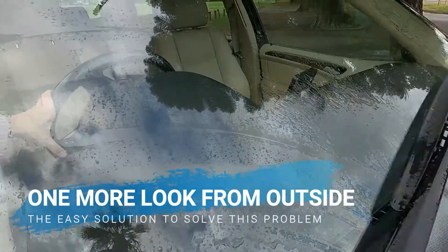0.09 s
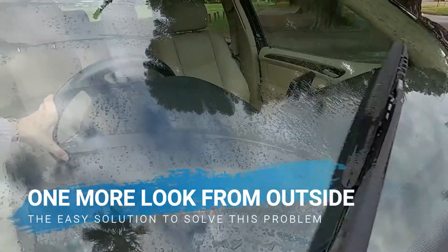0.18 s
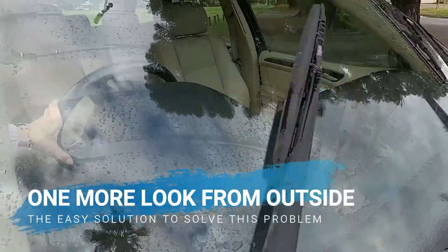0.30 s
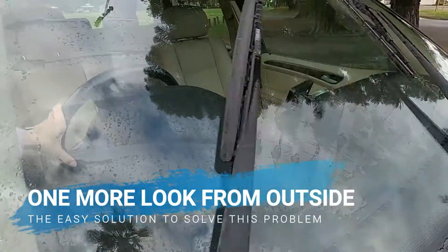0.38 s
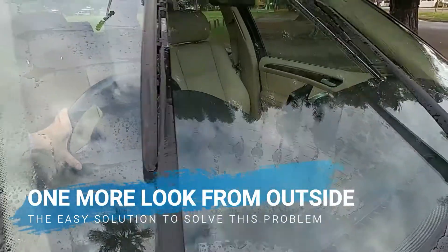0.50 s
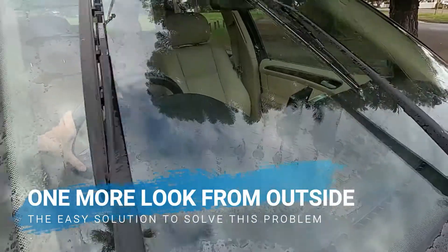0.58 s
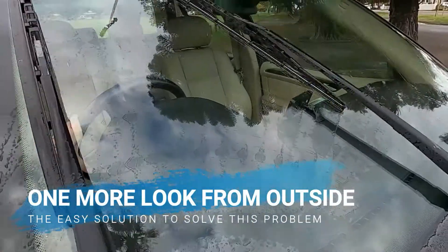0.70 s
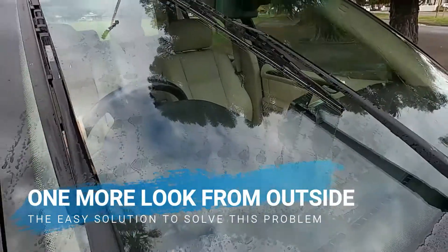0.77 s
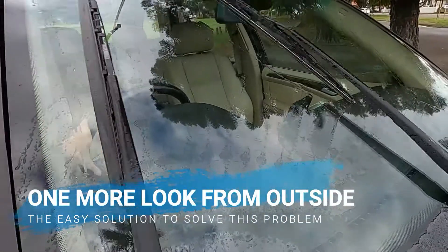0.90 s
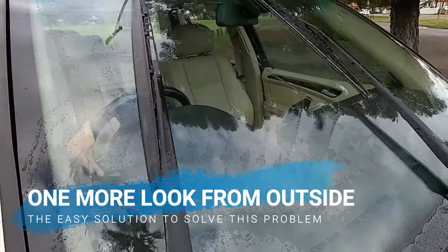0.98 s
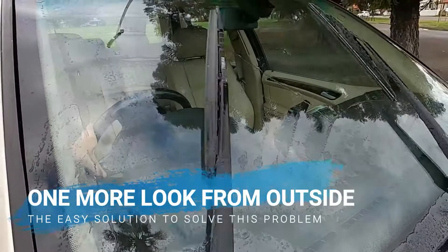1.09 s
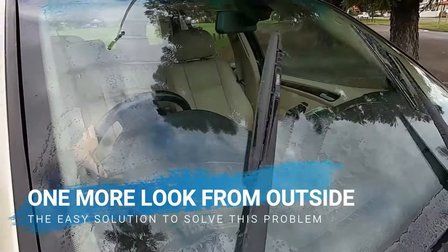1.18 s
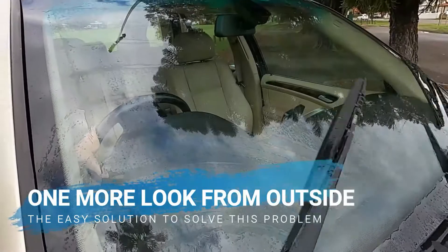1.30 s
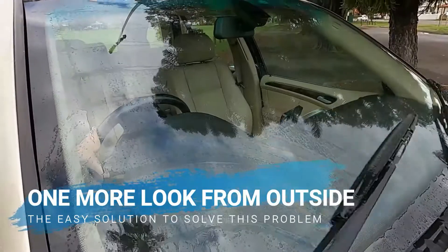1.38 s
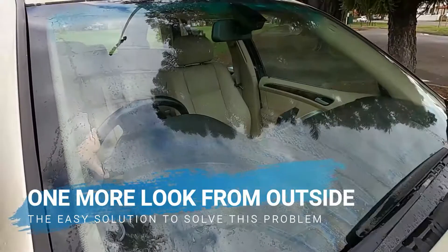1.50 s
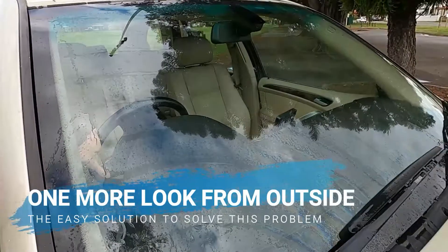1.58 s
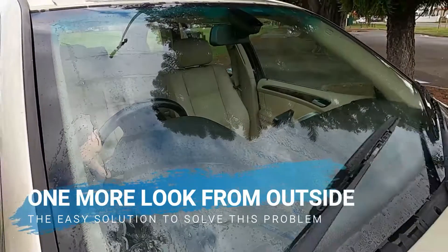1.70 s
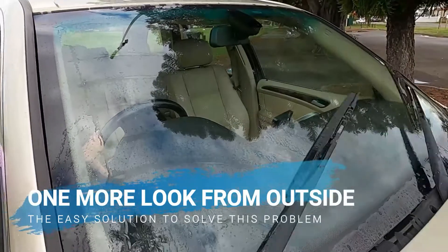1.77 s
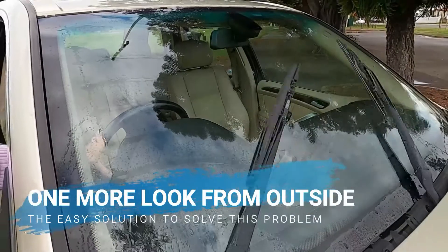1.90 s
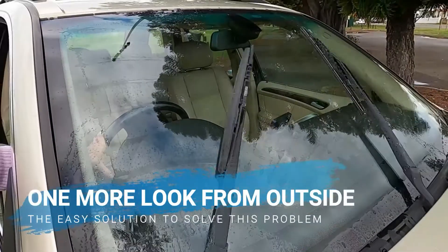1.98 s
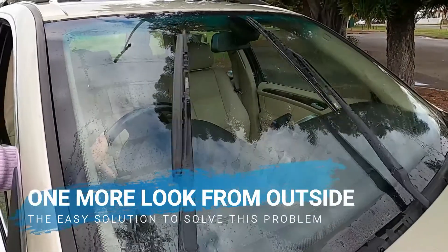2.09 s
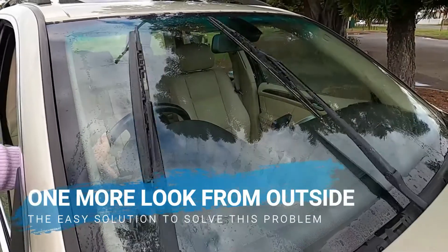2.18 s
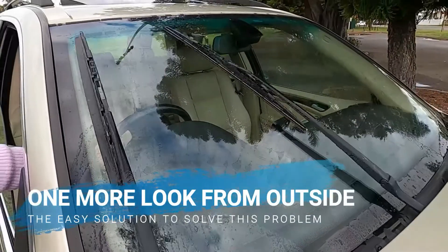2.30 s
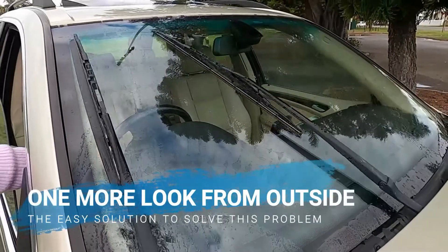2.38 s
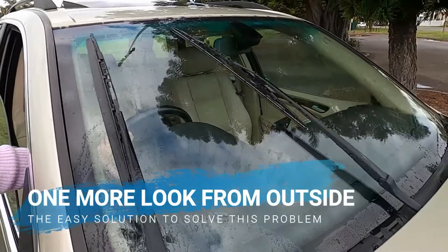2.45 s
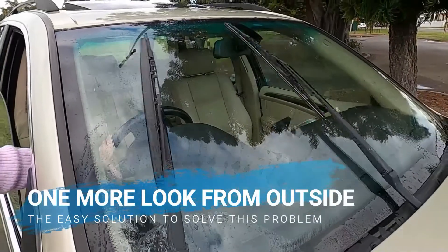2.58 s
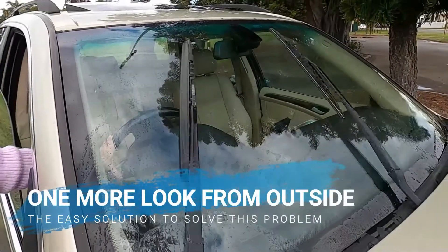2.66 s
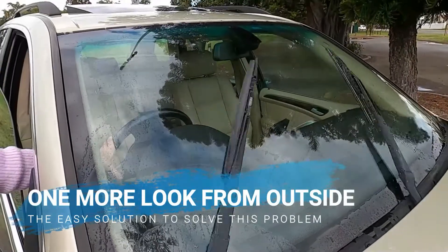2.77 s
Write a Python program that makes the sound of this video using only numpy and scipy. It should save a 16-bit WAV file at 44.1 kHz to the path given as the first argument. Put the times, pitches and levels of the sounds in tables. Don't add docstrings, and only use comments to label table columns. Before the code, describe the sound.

Windscreen wipers stutter over wet glass twice, thudding low and rattling, over faint traffic hum

```python
import sys
import numpy as np
from scipy import signal
from scipy.fft import rfft, irfft
from scipy.io import wavfile
from scipy.ndimage import map_coordinates

SR = 44100
rng = np.random.default_rng(int(sys.argv[2]) if len(sys.argv) > 2 else 0)


def inscribe(sig):
    pcm = np.round(np.clip(np.atleast_2d(sig).T, -1, 1) * 32767)
    wavfile.write(sys.argv[1], SR, pcm.astype(np.int16))


def makeup_ratio(level_db):
    decades = np.asarray(level_db, float) / 20
    return 10 ** decades


N = 125685

# frequency in Hz, level in dB per Hz.
STREET_COLOUR = [(200, -31), (300, -33), (500, -15), (900, 0), (1700, -7), (2300, -16), (4550, -21.5),
                 (15500, -71)]
# frequency in Hz, level in dB per Hz.
HUM_COLOUR = [(12, -55), (20, -28), (54, -5.5), (107, -5), (161, -5), (350, -32.5), (460, -60), (770, -120)]
# time in seconds, level in dB.
HUM_SWELL = [(0, -6.5), (.9, -2.2), (1.5, 2.5), (1.65, -10), (1.78, 1), (2.85, 0.3)]
# start in seconds, length in seconds, pitch in Hz, level in dB.
WHISTLES = [
    (-.04, .15, 3252, -60),
    (1.05, .22, 4441, -70),
]
# time in seconds, then rattle, drag and scrape levels in dB.
FRICTION = [(0, -58, -61.5, -48.5), (0.189, -60.5, -45.5, -48), (0.238, -52, -32, -35.5),
            (0.371, -35.5, -26.5, -33), (.44, -44, -35, -39), (.5, -50, -42, -46), (.7, -57.5, -40, -56),
            (.82, -55.5, -42.5, -60), (0.892, -65, -40.5, -48), (0.931, -73.5, -48, -65),
            (1.74, -75, -59, -55), (1.872, -50, -37.5, -42.5), (1.989, -42, -32.5, -33),
            (2.091, -49, -37, -41.5), (2.17, -59, -47, -86), (2.451, -51, -39, -58.5),
            (2.55, -72, -42.5, -53), (2.6, -78, -54, -77)]
# frequency in Hz, level in dB per Hz.
SCRAPE_COLOUR = [(300, -27), (450, 4), (700, -2), (1200, -11), (2300, -18.5), (3500, -34)]
# frequency in Hz, level in dB per Hz.
GLASS_COLOUR = [(25, -2.5), (48, -17.5), (63, 1.5), (80, 0), (115, -3.5), (255, -4), (480, -24.5),
                (2200, -49.5)]
# frequency in Hz, level in dB per Hz.
ARM_COLOUR = [(880, -16.5), (1500, -25.5), (2440, -12), (2970, -9), (3720, -10.5), (8710, -20),
              (12500, -36.5), (15500, -48)]
# frequency in Hz, level in dB per Hz.
EDGE_COLOUR = [(1500, -42), (4000, 4.5), (9000, -5), (12500, -12.5), (15200, -25)]
# start in seconds, peak level in dB, pitch in Hz.
EDGE_SNAPS = [(0.1301, -50, 4640), (0.1924, -41, 6340), (0.2593, -30, 4820), (0.2793, -24.5, 4640),
              (0.3062, -21.5, 6360), (0.3154, -24.5, 4530), (0.3406, -26, 7300), (0.3474, -30, 6250),
              (0.3614, -34, 4840), (0.3774, -25, 7260), (0.3994, -24, 6140), (0.4125, -30, 4770),
              (0.4204, -19.5, 4680), (0.4354, -23, 5900), (0.5024, -41, 4800), (0.5634, -37, 5330),
              (0.5846, -28, 4940), (0.6285, -43, 4830), (0.6874, -42, 4990), (0.7337, -32.5, 4970),
              (0.7574, -36, 5660), (0.8629, -23.5, 4700), (0.8859, -27.5, 4660), (1.8053, -42, 7360),
              (1.8342, -31.5, 6100), (1.8464, -49, 4500), (1.8537, -52, 5170), (1.8771, -47, 5030),
              (1.8951, -38, 4750), (1.9205, -42, 5750), (1.9364, -42, 5050), (1.9629, -23, 5300),
              (2.0084, -34, 7700), (2.0148, -28.5, 5170), (2.0338, -27, 5350), (2.0612, -30, 5130),
              (2.0867, -28.5, 4820), (2.0914, -28, 5520), (2.1151, -43, 5520), (2.1614, -34.5, 6700),
              (2.1794, -52, 5050), (2.2293, -38, 5580), (2.2614, -51, 4800), (2.3037, -49, 5100),
              (2.3311, -43, 5200), (2.3744, -36, 4770), (2.3844, -31, 5700), (2.4344, -29, 4560),
              (2.4538, -21.5, 5720), (2.4714, -26, 5710), (2.4964, -39, 4570), (2.5114, -27, 5770),
              (2.5686, -53, 4860)]
# start in seconds, peak level in dB, pitch in Hz.
FIRST_TICKS = [(0.22, -26, 4060), (0.2586, -38, 5150), (0.2773, -20, 2900), (0.3045, -21.5, 3000),
               (0.3506, -10.5, 3030), (0.3726, -12, 2680), (0.3846, -14, 3160), (0.4664, -19.5, 5100),
               (0.479, -31, 4400), (0.5215, -20.5, 5400), (0.5824, -35, 2460), (0.5938, -23, 4100),
               (0.628, -28, 2800), (0.6485, -24, 4840), (0.6645, -27, 5170), (0.6754, -33, 2950),
               (0.7144, -27.5, 4900), (0.742, -25, 2860), (0.7497, -26.5, 5230), (0.767, -28, 2700),
               (0.7755, -21, 5570), (0.7954, -35, 2770), (0.8051, -24.5, 3900), (0.82, -23, 3870),
               (0.8649, -24.5, 4800), (0.8688, -26, 2660), (0.8824, -18.5, 4670)]
# start in seconds, peak level in dB, pitch in Hz.
LOOSE_TICKS = [(0.9388, -42, 5600), (0.9802, -41.5, 3170), (1.0369, -35, 4300), (1.0385, -32, 8800),
               (1.077, -41, 6000), (1.1145, -36, 8400), (1.1223, -31, 2970), (1.3817, -38.5, 2800),
               (1.4561, -33.5, 2700), (1.5005, -34.5, 3170), (1.601, -36.5, 3260), (1.6733, -41.5, 2970),
               (1.7424, -42.5, 5700), (1.7614, -43, 3120), (1.7797, -37, 2940)]
# start in seconds, peak level in dB, pitch in Hz.
SECOND_TICKS = [(1.8334, -36, 2610), (1.8682, -38, 3040), (1.9051, -17, 2870), (1.9624, -24, 3030),
                (1.9774, -18, 3330), (1.9991, -13.5, 2854), (2.0724, -20, 2630), (2.149, -33, 2620),
                (2.2495, -28.5, 2860), (2.2782, -29, 4560), (2.363, -22.5, 5550), (2.3994, -22, 2830),
                (2.4196, -22, 3550), (2.4501, -25.5, 2720), (2.4782, -20.5, 5800), (2.5032, -20.5, 4750),
                (2.5317, -26, 4100), (2.582, -38.5, 3280), (2.6615, -37.5, 8300), (2.7212, -40.5, 4040),
                (2.8297, -40, 2840)]
# time in seconds, level in dB, pitch in Hz.
FIRST_SHUDDERS = [(0.181, -25, 94), (0.233, -7, 248), (0.253, -9, 253), (0.279, -3.5, 110), (0.3, -21, 127),
                  (0.325, -9.5, 253), (0.357, -8, 167), (0.382, -5.5, 95), (0.411, -6.5, 114),
                  (0.43, -5, 134), (0.452, -6.5, 147), (0.49, -8.5, 152), (0.527, -8.5, 124),
                  (0.551, -4.5, 117), (0.57, -9, 138), (0.591, -7.5, 120), (0.613, -6, 117),
                  (0.64, -30.5, 83.6), (0.664, -7.5, 100), (0.697, -12, 80.4), (0.728, -6.5, 104),
                  (0.747, -10.5, 106), (0.782, -19.5, 152), (0.835, -20.5, 104), (0.881, -38, 170),
                  (0.901, -18, 154.4), (0.991, -15, 145), (1.012, -25, 111)]
# time in seconds, level in dB, pitch in Hz.
SECOND_SHUDDERS = [(1.793, -33.5, 119), (1.873, -17, 240), (1.892, -9, 164), (1.947, -6, 162.6),
                   (1.965, -6.5, 116), (1.98, -5.5, 117), (2.007, -10, 118), (2.027, -11, 127),
                   (2.066, -5, 122), (2.093, -9.5, 107), (2.118, -12.5, 138), (2.133, -12, 137),
                   (2.171, -8.5, 119), (2.201, -13.5, 105), (2.218, -11.5, 110), (2.243, -12.5, 102),
                   (2.276, -13, 110.4), (2.312, -12, 124), (2.339, -17, 115), (2.355, -9.5, 121),
                   (2.396, -11.5, 120.6), (2.426, -15.5, 120), (2.452, -9.5, 106), (2.467, -14, 105),
                   (2.493, -20.5, 115), (2.522, -19.5, 155), (2.538, -22, 99), (2.562, -21, 128),
                   (2.577, -17, 127), (2.786, -24, 103)]


def unit(x):
    return x / np.sqrt(np.mean(x ** 2) + 1e-20)


def along(points, hz):
    f, db = np.transpose(points)
    return np.interp(np.log(hz + 1), np.log(f + 1), db, left=-120, right=-120)


def over_time(times, values):
    return np.interp(np.arange(N) / SR, times, values)


def wobble(rate):
    knots = rng.standard_normal(int(N * rate / SR) + 4)
    return map_coordinates(knots, [np.arange(N) * rate / SR])


def noise(colour, low_hz=0):
    hz = np.fft.rfftfreq(N, 1 / SR)
    spectrum = rfft(rng.standard_normal(N)) * makeup_ratio(along(colour, hz))
    return irfft(spectrum, N) / np.std(irfft(spectrum * (hz >= low_hz), N))


def place(starts, rows):
    at = np.round(np.asarray(starts) * SR).astype(int)[:, None] + np.arange(rows.shape[1])
    keep = (at >= 0) & (at < N)
    return np.bincount(at[keep], rows[keep], N)


def soft_start(t):
    return 1 - np.exp(-t / 0.0018)


def traffic():
    street = makeup_ratio(-57 + 0.8 * wobble(24.82)) * noise(STREET_COLOUR)
    hum_db = -37.5 + over_time(*np.transpose(HUM_SWELL)) + 3.5 * wobble(31)
    return street + makeup_ratio(hum_db) * noise(HUM_COLOUR)


def bird():
    now = np.arange(N) / SR
    song = np.zeros(N)
    for start, length, hz, db in WHISTLES:
        swell = np.sin(np.pi * np.clip((now - start) / length, 0, 1))
        song += makeup_ratio(db + 2 * wobble(61)) * swell * np.sin(2 * np.pi * hz * now + wobble(50))
    return song


def scrape():
    s, _, _, db = np.transpose(FRICTION)
    return makeup_ratio(over_time(s, db)) * unit(makeup_ratio(3.5 * wobble(70)) * noise(SCRAPE_COLOUR))


def drag():
    s, _, db, _ = np.transpose(FRICTION)
    rumble = makeup_ratio(-2.5 + 2.5 * wobble(45)) * noise(GLASS_COLOUR, low_hz=307.6)
    return makeup_ratio(over_time(s, db)) * rumble


def rattle():
    knocks_per_s, spread_db = 300, 10
    s, db, _, _ = np.transpose(FRICTION)
    t = np.arange(SR // 60) / SR
    chance = rng.uniform(0, 1, (int(knocks_per_s * N / SR), 10))
    start = (np.arange(len(chance)) + 2 * chance[:, 0]) / knocks_per_s
    size = makeup_ratio(spread_db * chance[:, 1:2])
    hz = 2200 * 5.2 ** chance[:, 2:6, None]
    late = np.maximum(t - 0.0029 * chance[:, 6:, None], 0)
    tones = makeup_ratio(along(ARM_COLOUR, hz) / 2) * np.exp(-late * hz / 7) * np.sin(2 * np.pi * hz * late)
    knocks = unit(place(start, size * tones.sum(axis=1)))
    snap_t60_s = 0.014
    puffs = place(start, size * makeup_ratio(-60 * t / snap_t60_s) * soft_start(t))
    snaps = unit(puffs * noise(ARM_COLOUR))
    hiss = noise(ARM_COLOUR)
    return makeup_ratio(over_time(s, db)) * (makeup_ratio(-2.5) * knocks + makeup_ratio(-3) * snaps + makeup_ratio(-11.5) * hiss)


def edge_snaps():
    ring_db, ring_cycles = 0.5, 54
    puff_db, puff_t60_s = -5, 0.018
    s, db, hz = np.transpose(EDGE_SNAPS)[:, :, None]
    t = np.arange(SR // 30) / SR
    ring = makeup_ratio(db + ring_db - 60 * t * hz / ring_cycles) * soft_start(t) * np.sin(2 * np.pi * hz * t)
    puffs = place(s[:, 0], makeup_ratio(db + puff_db - 60 * t / puff_t60_s) * soft_start(t))
    return place(s[:, 0], ring) + puffs * noise(EDGE_COLOUR)


def ticks():
    ring_cycles, side_cycles = 40, 50
    crack_t60_s, knock_t60_s = 0.02, 0.044
    events = list(FIRST_TICKS) + list(LOOSE_TICKS) + list(SECOND_TICKS)
    s, db, hz = np.transpose(events)[:, :, None]
    start = s[:, 0]
    t = np.arange(SR // 14) / SR
    ring = 2 * makeup_ratio(-60 * t * hz / ring_cycles) * np.sin(2 * np.pi * hz * t) * soft_start(t)

    chance = rng.uniform(0, 1, (len(s), 12, 2, 1))
    side_hz = 2400 * 5.3 ** chance[:, :, 0]
    late = np.maximum(t - 0.0054 * chance[:, :, 1], 0)
    side_level = makeup_ratio(along(ARM_COLOUR, side_hz) / 2 - 60 * late * side_hz / side_cycles)
    side = (side_level * np.sin(2 * np.pi * side_hz * late)).sum(axis=1)
    tones = place(start, makeup_ratio(db) * (ring + makeup_ratio(-8) * side))

    crack_db = db + 3 * np.log2(hz / 4000)
    cracks = place(start, makeup_ratio(crack_db - 60 * t / crack_t60_s) * soft_start(t))
    crack = makeup_ratio(1.8 * wobble(300)) * cracks * noise(ARM_COLOUR)
    knocks = place(start, makeup_ratio(db - 6 - 60 * t / knock_t60_s) * soft_start(t))
    return makeup_ratio(-8.5) * (tones + crack + knocks * noise(SCRAPE_COLOUR))


def echo(x):
    t60_s = 0.09
    t = np.arange(SR // 5) / SR
    tail = rng.standard_normal(len(t)) * makeup_ratio(-60 * t / t60_s)
    return signal.fftconvolve(x, tail / np.linalg.norm(tail))[:N]


def shudders():
    longest_s, drift, half_s = 0.026, 0.1, (SR // 10) / SR
    s, db, hz = np.transpose(list(FIRST_SHUDDERS) + list(SECOND_SHUDDERS))[:, :, None]
    gap = np.diff(s, axis=0, prepend=-1, append=10)
    length = np.minimum(0.72 * np.minimum(gap[:-1], gap[1:]), longest_s)
    t = np.arange(SR // 5) / SR - half_s
    chance = rng.uniform(-0.86, 1, (len(s), 2))
    bend = 1 + drift * chance[:, :1] * t / length
    wave = np.cos(2 * np.pi * hz * t * bend + np.pi * chance[:, 1:])
    swell = makeup_ratio(db - 5) * np.exp(-2 * (t / length) ** 2)
    start = s[:, 0] - half_s
    rough = place(start, swell) * noise(GLASS_COLOUR)
    return place(start, swell * wave) + makeup_ratio(-14) * rough


def scene():
    background = traffic() + bird()
    rubber = scrape() + drag()
    metal = rattle() + edge_snaps() + ticks()
    return (background + rubber + metal + makeup_ratio(-8.5) * echo(metal) + shudders())[None]


def roll_off(x):
    return signal.sosfilt(signal.butter(12, 15700, fs=SR, output="sos"), x)


def record(dry):
    top = 0.55
    limited = dry / (1 + np.abs(dry / top) ** 4) ** (1 / 4)
    return roll_off(limited)


dry = scene()
out = record(dry)
inscribe(out)
```